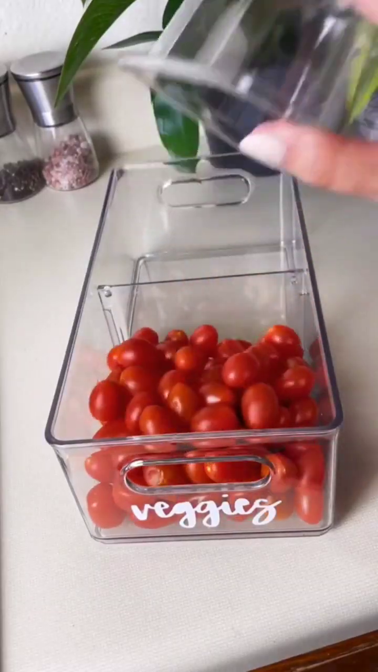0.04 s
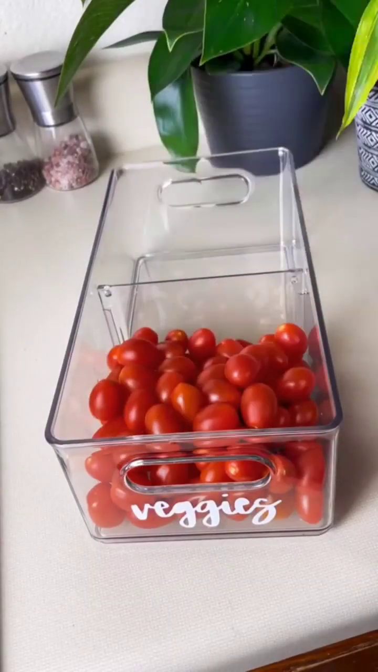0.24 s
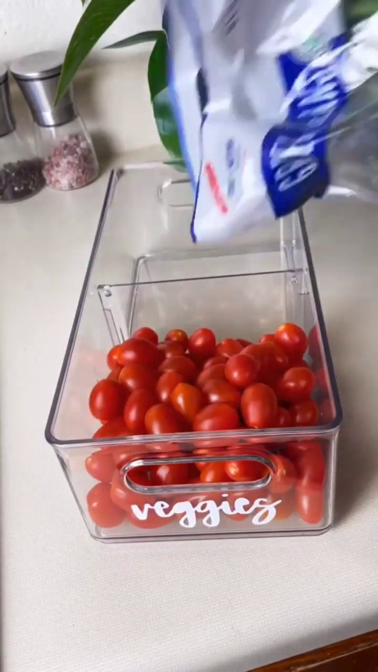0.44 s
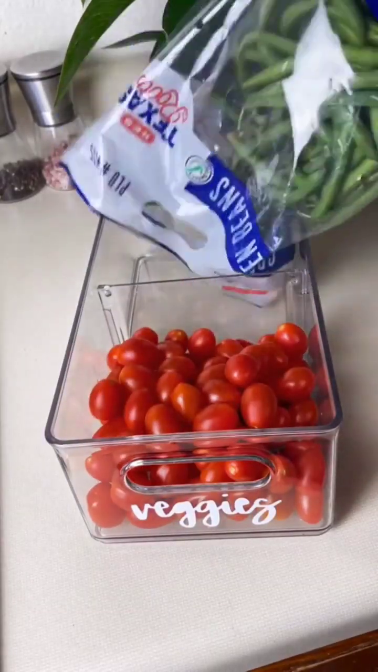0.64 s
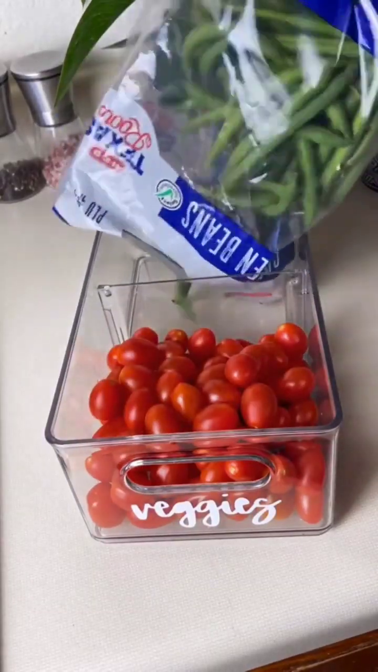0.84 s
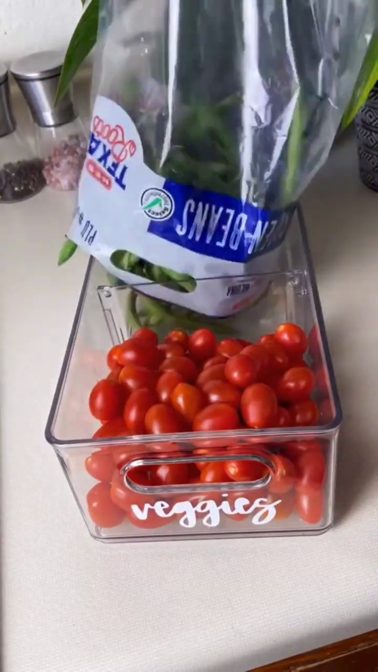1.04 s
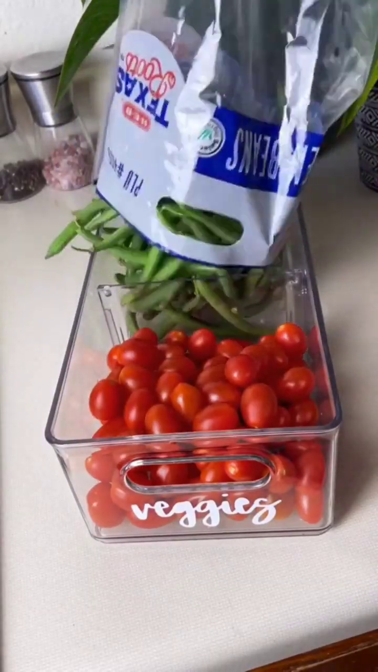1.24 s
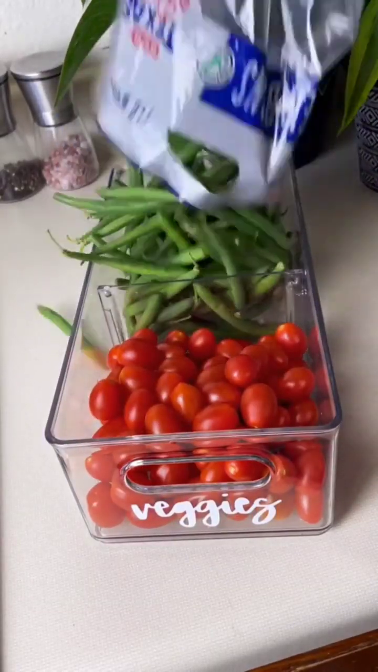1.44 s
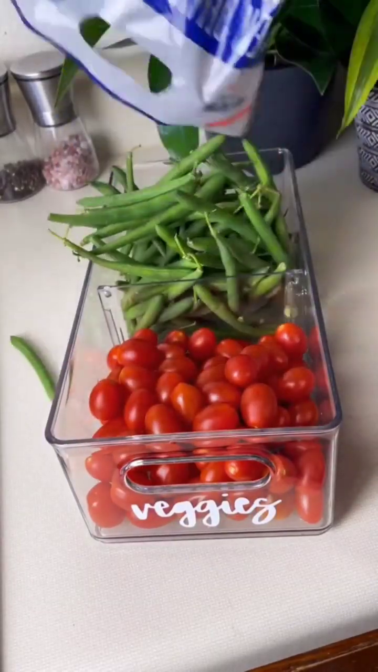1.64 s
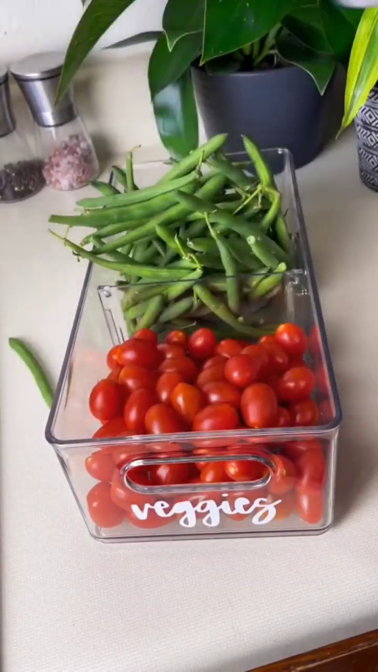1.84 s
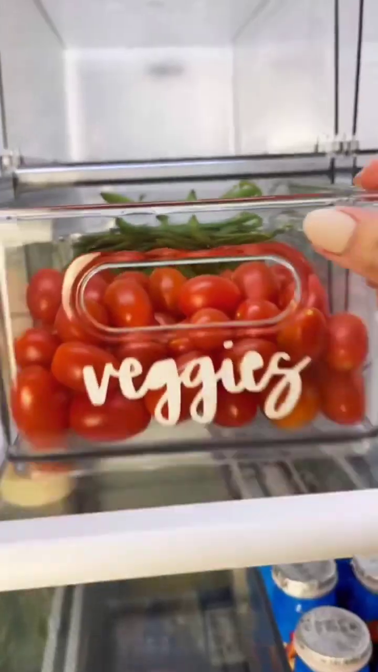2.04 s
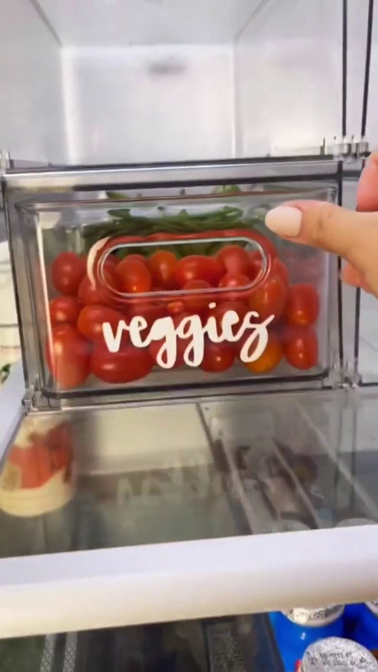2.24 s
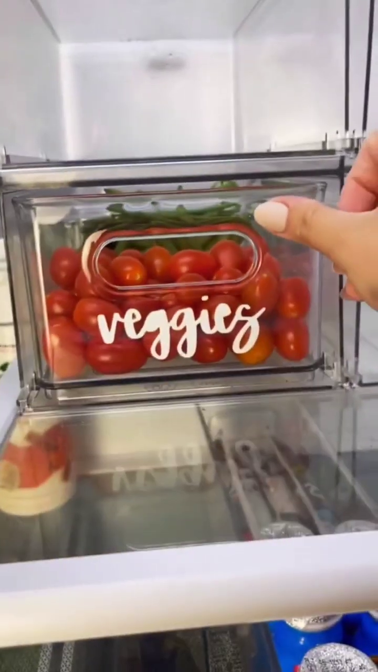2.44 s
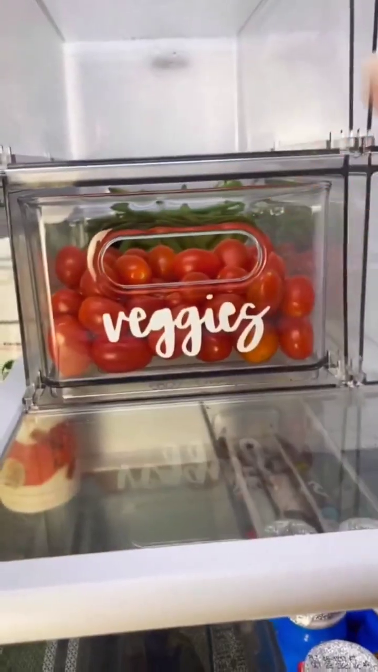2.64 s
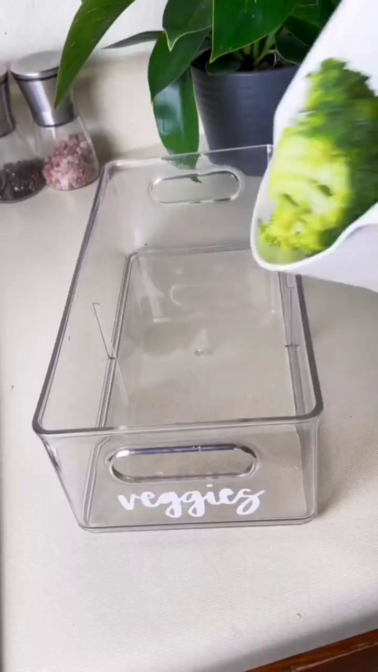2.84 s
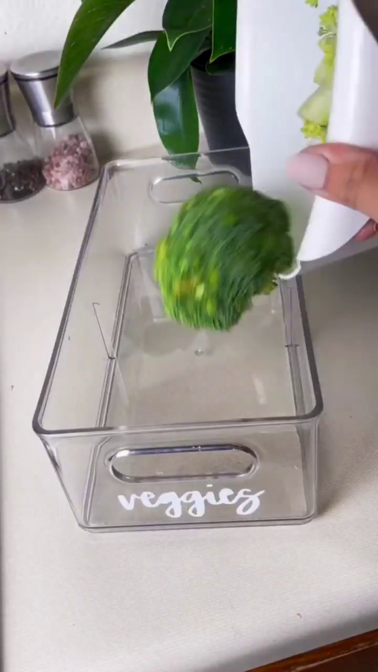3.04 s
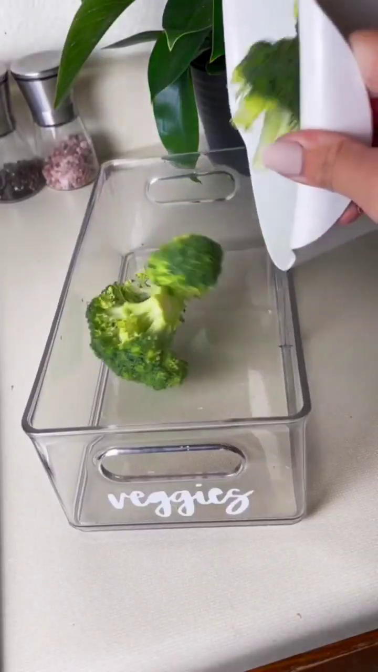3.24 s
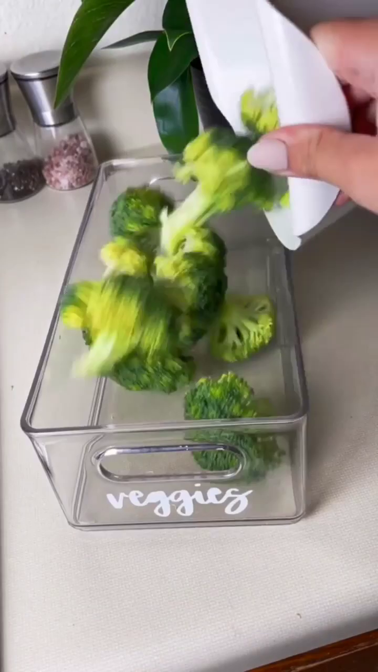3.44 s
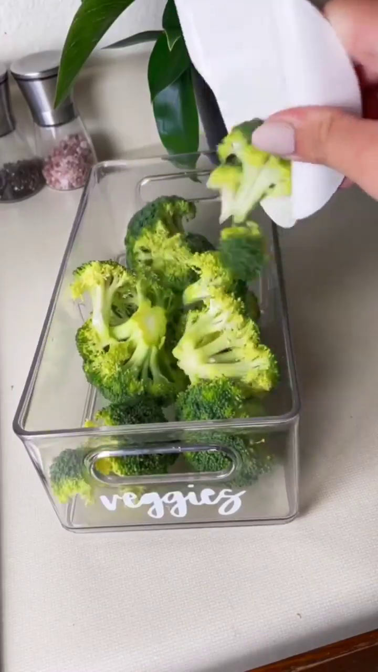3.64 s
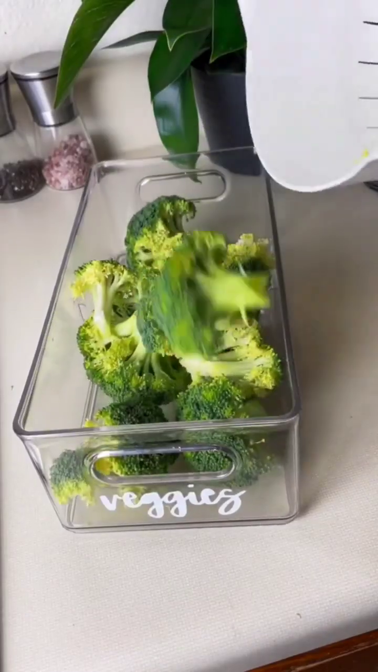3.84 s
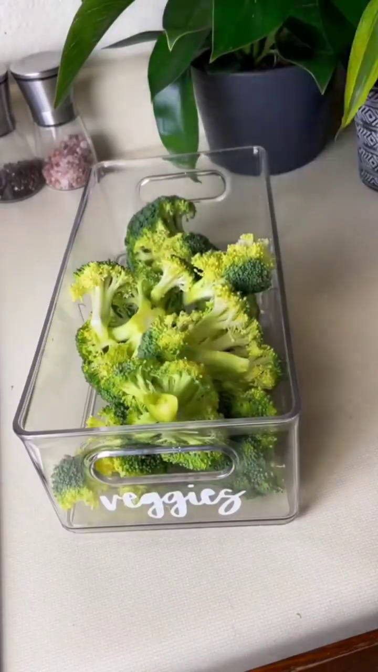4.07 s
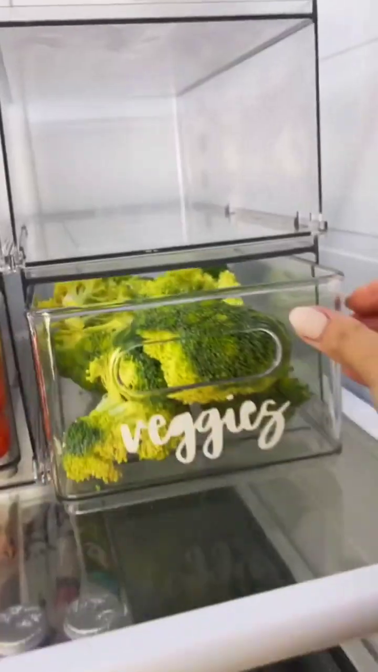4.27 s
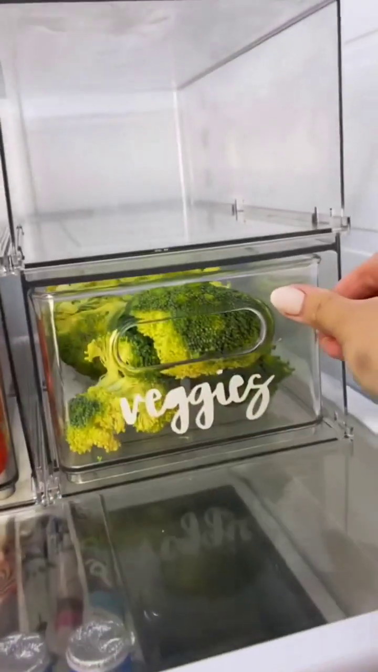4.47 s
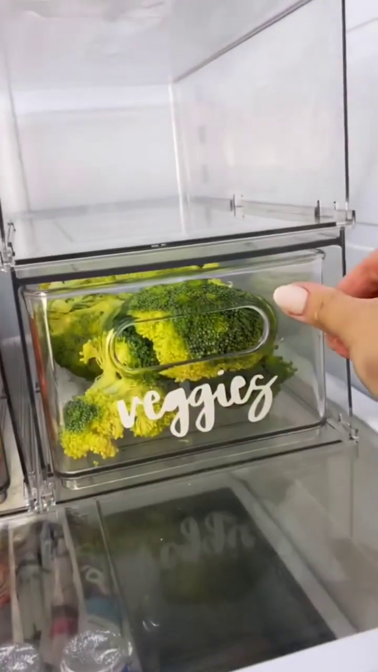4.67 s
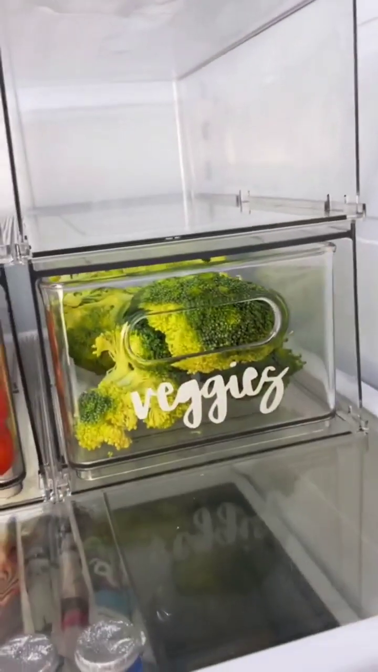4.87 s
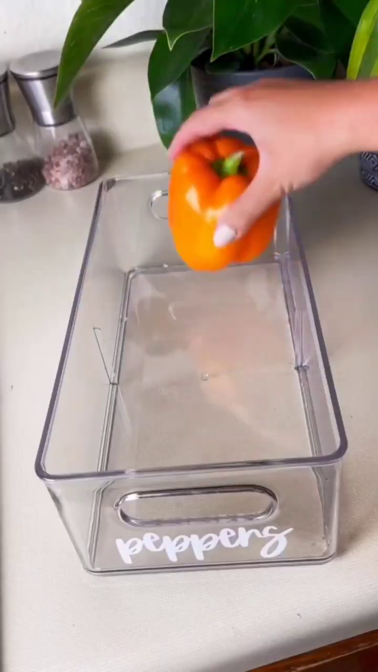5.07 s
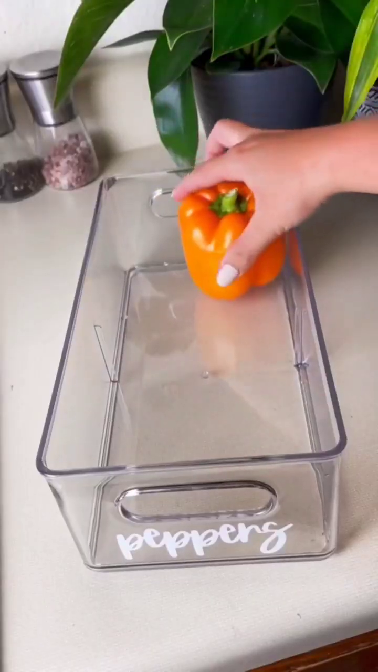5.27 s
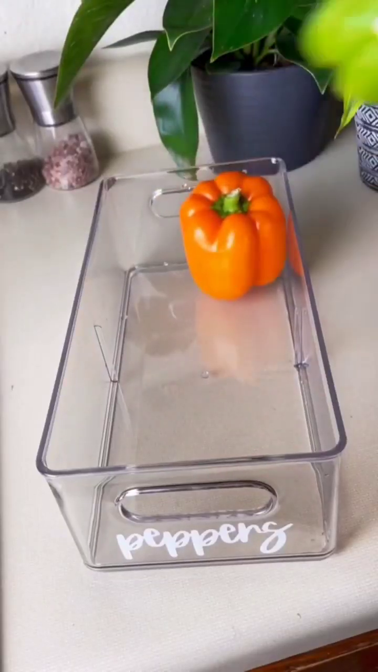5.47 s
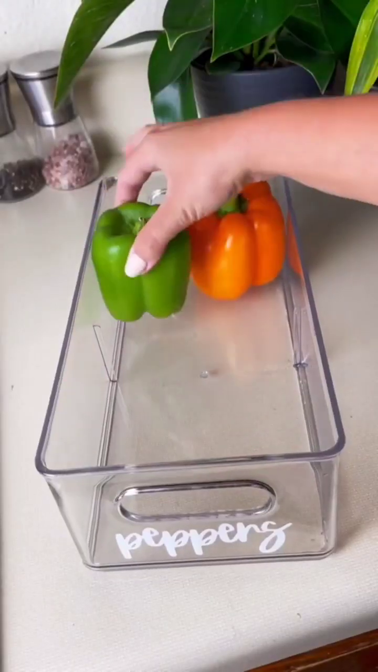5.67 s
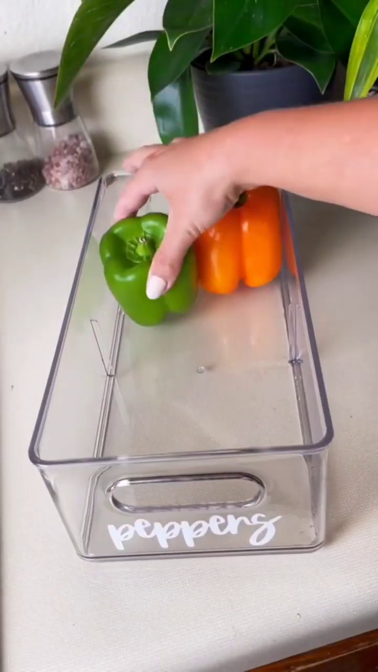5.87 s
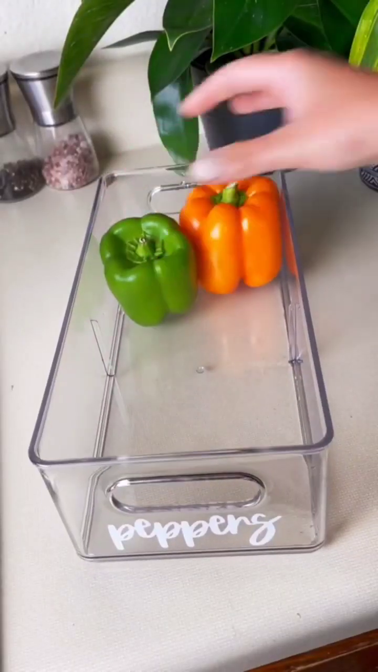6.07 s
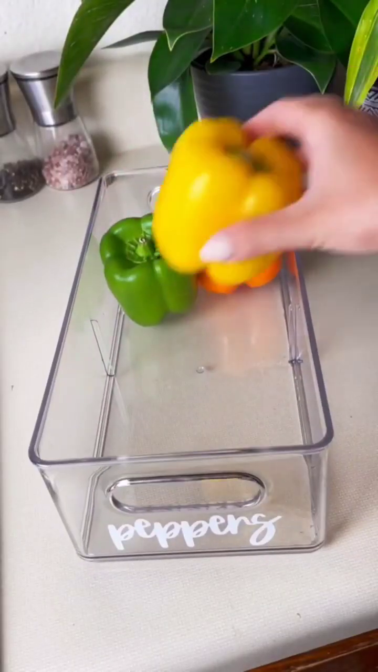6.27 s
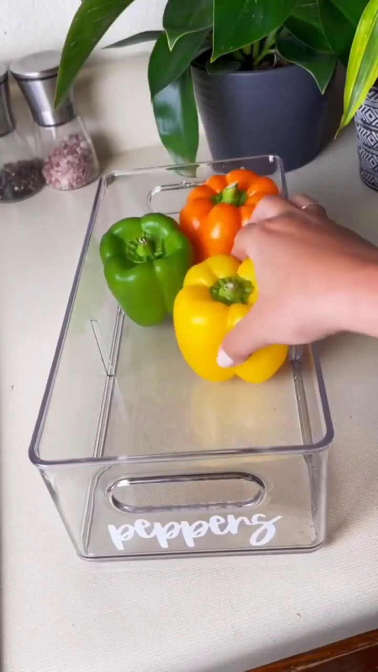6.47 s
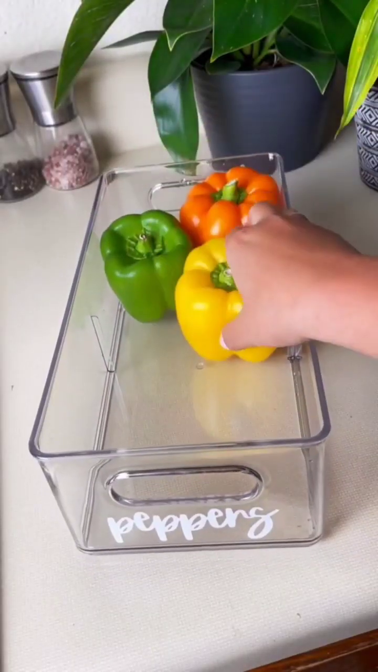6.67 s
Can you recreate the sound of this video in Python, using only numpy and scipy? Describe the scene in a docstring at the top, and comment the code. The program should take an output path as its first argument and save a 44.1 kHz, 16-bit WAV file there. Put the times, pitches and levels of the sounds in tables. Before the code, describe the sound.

A close stereo view of a small kitchen with short, dry echo. After a nearly quiet start, from 0.3 s thin plastic film crinkles and snaps brightly, strongest at 0.5 to 1.0 s, while green beans patter and click on a hard plastic bin; further folds and taps continue until about 1.65 s, with a faint last crinkle near 1.8 s. From 1.9 s a heavy bin scrapes along a refrigerator shelf, knocking lightly, and hits its stop with a deep thump at 2.3 s over low hum. Broccoli brushes out of a bowl and tumbles with hollow, soft-edged knocks from 3.0 to 3.55 s, then a few faint drops until 4.0 s. A second bin slides in at 4.1 s and bumps firmly at 4.45 s. From 5.1 to 6.6 s peppers land gently with quiet, dull thuds, small rubs and finger slides over low room rumble.

```python
"""Crinkling film and pattering beans come first, close to the microphone, from a kitchen counter.
Green beans pour from a bag into a clear plastic bin, broccoli tumbles from a bowl, peppers are set down.
Twice a full bin slides along a refrigerator shelf and bumps against its stop, over the cabinet's hum.
Film, patter and rubbing are random grains or scratches under swelling gains; blows are noise bursts
and damped sines of the plastic. Rumble, air, hum and hiss lie behind, and the kitchen answers with echo."""
import sys
import numpy as np
from scipy import signal
from scipy.fft import rfft, irfft, next_fast_len
from scipy.io import wavfile
from scipy.ndimage import uniform_filter1d, map_coordinates

SR = 44100
rng = np.random.default_rng(int(sys.argv[2]) if len(sys.argv) > 2 else 0)


def persist_wave(psi):
    """Save psi, clipped to +-1, as 16-bit WAV."""
    counts = np.round(np.clip(psi, -1, 1) * 32767).astype(np.int16)
    wavfile.write(sys.argv[1], SR, np.atleast_2d(counts).T)


N = 295911

# Contact levels are before the trims of each source; spectra are relative colours.
# Movements of the bag: (t/s, swell/s, length/s, crinkle level/dB, patter level/dB)
BAG_MOVES = [(0.268, .015, 0.48, -57, -59), (0.48, 0.074, 0.18, -41.5, -43),
             (0.547, 0.12, 0.92, -43.5, -45), (0.816, .01, 0.11, -40.5, -43.5),
             (0.912, 0.066, 0.099, -29.5, -31.5), (1.219, .01, 0.26, -50, -51),
             (1.552, 0.014, 0.067, -47, -49), (1.642, .01, 0.054, -56, -68)]
# Sharp folds of the film: (t/s, level before trim/dB)
FOLDS = [(0.292, -30.5), (0.3262, -30.5), (0.3612, -28), (0.4545, -32.5), (0.5166, -16.5), (0.5272, -22.5),
         (0.56, -20), (0.618, -17.5), (0.7, -20.5), (0.747, -16), (0.834, -23), (0.873, -23.5),
         (0.9446, -14.5), (0.985, -16), (1.246, -26), (1.2695, -18.5), (1.383, -25.5), (1.4319, -16),
         (1.5888, -24.5), (1.785, -40.5)]
# Colour of the film: (f/Hz, level/dB)
FILM_TONE = [(880, -36.5), (1500, -0.5), (2220, -5), (2580, -1.5), (2790, -2), (4990, -3.5), (5560, -4),
             (7470, -5), (8170, -9), (13500, -10.5), (15800, -13.5)]
# Beans that strike the bin: (t/s, wall knock level/dB, knock f/Hz, floor thud level/dB, click level/dB)
BEAN_HITS = [(0.294, -33.5, 820, -58, -50.5), (0.559, -30, 2600, -49, -29), (0.571, -22.5, 1130, -36, -41),
             (0.590, -26.5, 1440, -47.5, -39.5), (0.626, -12, 830, -40.5, -28),
             (0.6608, -16, 760, -32, -9.5), (0.714, -39, 516, -42.5, -33.5), (0.8195, -18, 3220, -28, -15),
             (0.8345, -23, 1450, -43.5, -30), (0.9865, -22, 2610, -26, -25.5),
             (1.009, -19.5, 1430, -37, -25.5), (1.024, -15.5, 1290, -29, -30.5),
             (1.049, -24, 2500, -33, -27.5), (1.144, -26, 730, -27, -34.5), (1.2462, -31, 1100, -45, -31),
             (1.344, -44, 1840, -50, -33.5), (1.365, -24, 2660, -24, -27), (1.385, -21.5, 2500, -47, -27),
             (1.413, -29, 2620, -35, -31), (1.437, -19.5, 1520, -34.5, -26),
             (1.451, -29.5, 1450, -32.5, -35.5), (1.488, -33, 2800, -37.5, -28),
             (1.5745, -20, 990, -37, -23), (1.5988, -26, 1490, -49, -35), (1.614, -30, 1500, -38.5, -38)]
# Colour of bean contacts: (f/Hz, level/dB)
BEAN_TONE = [(120, -27), (200, 3), (596, -4), (755, -3.5), (874, -4.5), (1910, -8), (2600, -1.5),
             (4030, -8.5), (4920, -9.5), (5910, -26.5), (15500, -23)]
# Colour of the small falling beans: (f/Hz, level/dB)
PATTER_TONE = [(82, -54.5), (140, -8), (183, 1.5), (235, -3), (442, 6), (488, -3), (1100, -5.5), (1360, -4),
               (1850, -14.5), (2550, -7.5), (4000, -18), (5200, -39.5), (8800, -120)]
# Nominal modes of the bin's floor under beans: (f/Hz, level/dB, t60/s)
BEAN_FLOOR = [(196, 1, .055), (330, -8, .035), (425, -5, .03)]
# Florets that land: (t/s, wall knock level/dB, knock f/Hz, floor thud level/dB, click level/dB)
FLORET_HITS = [(2.984, -32.5, 1493, -41.5, -49), (3.032, -36.5, 1232, -46.5, -58),
               (3.098, -32.5, 1260, -25, -32.5), (3.111, -24.5, 1627, -42.5, -41.5),
               (3.14, -11.5, 2200, -26.5, -24), (3.205, -31, 1193, -39, -33.5),
               (3.246, -34, 1135, -34.5, -39.5), (3.293, -29, 1193, -28, -45),
               (3.341, -36, 1367, -24.5, -41), (3.366, -14, 1184, -26, -29), (3.38, -27, 1303, -27, -30.5),
               (3.425, -34, 1320, -28, -38), (3.46, -28, 1170, -25.5, -33), (3.471, -20.5, 800, -24.5, -33),
               (3.487, -14, 1800, -19.5, -27.5), (3.517, -21, 1320, -27, -34),
               (3.529, -18, 850, -21, -38.5), (3.539, -24.5, 1263, -28, -34.5),
               (3.644, -41, 1180, -32, -56.5), (3.766, -56, 2470, -42, -52), (3.825, -47, 1390, -36, -50.5),
               (3.886, -40.5, 1800, -36, -50.5), (3.973, -31.5, 804, -32.5, -39)]
# Colour of floret contacts: (f/Hz, level/dB)
FLORET_TONE = [(190, -35), (320, 1.5), (430, -1), (560, -10), (760, 1), (1040, -7.5), (1600, -8.5),
               (2300, -14.5), (2510, -9), (2800, -9), (3820, -15.5), (4480, -18), (5020, -17.5),
               (15500, -41)]
# Colour of florets rolling on: (f/Hz, level/dB)
ROLLING_TONE = [(110, -35), (194, -5.5), (488, -4.5), (552, -10.5), (730, -13.5), (985, -17), (1150, -22),
                (1400, -22), (3500, -29.5), (4550, -48.5), (7700, -120)]
# Colour of florets rustling: (f/Hz, level/dB)
RUSTLE_TONE = [(1180, -20), (2000, -8.5), (3600, -8), (4320, -2), (4550, -7.5), (4960, -5), (15000, -24),
               (15800, -18)]
# Florets brush along the bowl: (t/s, length/s, level/dB)
BRUSHES = [(2.71, 0.0547, -59.5), (2.949, 0.069, -63), (3.092, 0.49, -58), (3.604, 0.22, -67.5)]
# Nominal modes of the bin's floor under broccoli: (f/Hz, level/dB, t60/s)
FLORET_FLOOR = [(194, 0, .07), (310, -14, .05), (370, -14, .06), (425, -13, .05)]
# A pepper touches the bin: (t/s, wall knock level/dB, knock f/Hz, floor thud level/dB, click level/dB)
PEPPER_HITS = [(5.126, -42, 487, -45, -72), (5.160, -43, 440, -41, -78), (5.186, -42.5, 1290, -57, -68),
               (5.252, -55, 1290, -49.5, -72), (5.312, -49.5, 613, -42, -89), (5.658, -47.5, 567, -42, -66),
               (5.682, -39.5, 425, -61, -63.5), (5.699, -35.5, 412, -42, -55), (5.726, -48, 1100, -58, -58),
               (5.806, -46, 544, -44, -76.5), (6.007, -43, 1480, -53, -53), (6.485, -34, 566, -38, -50),
               (6.538, -41, 1310, -33.5, -71), (6.582, -40.5, 1330, -45, -51)]
# Colour of pepper contacts and rubs: (f/Hz, level/dB)
PEPPER_TONE = [(150, 2.5), (250, 3.5), (573, -5), (1140, -15.5), (1310, -15), (1820, -21.5), (2530, -25.5),
               (3110, -31), (8620, -50), (12600, -45), (15500, -41.5)]
# A pepper is eased into place: (t/s, swell/s, length/s, level/dB)
RUBS = [(5.094, 0.02, 0.095, -50.5), (5.226, 0.012, 0.11, -62.5), (5.66, 0.037, 0.0512, -49),
        (5.739, 0.0098, 0.104, -57), (5.973, 0.027, 0.016, -54), (6.443, 0.037, 0.19, -51.5)]
# Fingers slide over a pepper's skin: (t/s, swell/s, length/s, level/dB)
TOUCHES = [(5.678, .02, .04, -68), (6.21, 0.017, .035, -74), (6.433, 0.055, .055, -63.5),
           (6.529, 0.048, .12, -72)]
# Colour of fingers on skin: (f/Hz, level/dB)
SKIN_TONE = [(1000, -23.5), (4000, 1), (9000, -9), (12500, 2.5), (15500, -5)]
# Nominal modes of the bin's floor under a heavy pepper: (f/Hz, level/dB, t60/s)
PEPPER_FLOOR = [(89.6, 5.5, 0.097), (231, -18, 0.24), (386.6, -16, 0.12)]
# A bin goes into the refrigerator:
# (t/s, slide length/s, stay length/s, scrape level/dB, hum level/dB, pitch ratio of the loaded bin)
VISITS = [(1.89, .46, 0.8, -49.5, -46, .62), (4.12, 0.37, 0.7, -50.5, -44, 0.96)]
# A full bin knocks on the shelf: (t/s, wall knock level/dB, knock f/Hz, floor thud level/dB, click level/dB)
SHELF_HITS = [(1.88, -40.5, 2650, -62, -33), (1.925, -39.5, 824, -38.5, -53),
              (1.997, -30.5, 606, -40.5, -59), (2.138, -33, 1260, -54, -58.5), (2.219, -31, 612, -41, -40),
              (2.254, -28, 2110, -49, -36.5), (2.276, -38, 2200, -29, -43.5), (2.289, -30, 543, -38, -52.5),
              (2.304, -21, 926, -44, -19), (2.316, -12, 1080, -14.5, -26), (2.471, -53, 1907, -46.5, -67.5),
              (2.576, -59.5, 1800, -52, -69), (4.144, -44.5, 1010, -27.5, -64),
              (4.166, -34.5, 1900, -35, -40), (4.205, -27.5, 530, -29.5, -40.5),
              (4.228, -33, 493, -38, -49), (4.418, -24, 756, -35, -42), (4.449, -15, 1218, -29, -24),
              (4.452, -15.5, 327, -10.5, -31.5), (4.471, -25, 1700, -26, -36.5),
              (4.500, -48, 2570, -57, -36.5), (4.536, -42, 1090, -48, -53), (4.663, -42.5, 950, -33, -77)]
# Colour of shelf contacts: (f/Hz, level/dB)
SHELF_TONE = [(130, -28), (210, 0), (300, 4.5), (540, -1), (663, -8.5), (1050, -11), (1280, -12.5),
              (1420, -15), (2210, -12.5), (3510, -20.5), (5570, -22), (11500, -31.5), (13100, -37),
              (15500, -33)]
# Colour of the sliding bin: (f/Hz, level/dB)
SCRAPE_TONE = [(76, -33), (130, 6), (247, -0.5), (346, -6), (440, 0), (644, -10), (819, -10), (1300, -13.5),
               (2560, -17), (6180, -23.5), (10600, -34), (12700, -41), (15500, -52.5)]
# The sliding bin catches and rubs: (t/s, length/s, level/dB)
DRAGS = [(1.946, 0.016, -62), (2.272, 0.028, -49), (4.175, 0.037, -49.5), (4.423, 0.014, -41.5)]
# Colour of those rubs: (f/Hz, level/dB)
DRAG_TONE = [(150, -34), (330, 5), (550, 5), (800, -5), (1250, 2), (2000, -6), (3500, -20), (12000, -36.5)]
# A loaded bin jolts the shelf: (t/s, sag level/dB, f/Hz)
JOLTS = [(1.925, -22, 104.8), (2.3176, -7, 108.3), (4.226, -25.5, 102.4), (4.456, -15, 108.5)]
# Modes of the sagging shelf: (multiple of its pitch, level/dB, t60/s)
SAG_MODES = [(1, 0, .175), (1.7, -13, .09), (2.25, -15, .07)]
# Modes of the bin before its load lowers them: (f/Hz, level/dB, t60/s)
BOOM_MODES = [(180, -4, .08), (250, -3, .06), (322, -3, .045), (382, -2.5, .05), (535, -17, .05)]
# Nominal resonances of the bin's plastic walls: (f/Hz, level/dB, t60/s)
WALL_MODES = [(693, -18.5, 0.065), (795, -9.5, 0.038), (1126, -20, .035), (1275, -24, .06),
              (1491, -17.5, 0.052), (1845, -14.5, 0.05), (2120, -21.5, 0.055), (2513, -16, 0.053),
              (3324, -24, 0.042), (3855, -20.5, 0.048), (4900, -32, .06)]
# How fast the kitchen's answer dies: (f/Hz, t60/s)
KITCHEN_DECAY = [(150, 0.25), (1000, 0.15), (5000, 0.12), (14000, 0.097)]
# Background at the microphone, step by step: (from t/s, deep rumble level/dB, room air level/dB, hum level/dB)
ROOM_STEPS = [(0, -61.5, -50, -63), (0.2, -63, -57, -89), (1.873, -54.5, -55, -72),
              (2.699, -68, -53.5, -78), (4.12, -53, -52.5, -64), (4.92, -51, -59.5, -61),
              (5.475, -49.5, -58, -61), (6.176, -51, -60.5, -59)]
# Colour of the deep rumble: (f/Hz, level/dB)
RUMBLE_TONE = [(20, -1), (45, -2), (80, 5.5), (110, -0.5), (160, -22), (400, -71)]
# Colour of the room air: (f/Hz, level/dB)
AIR_TONE = [(25, -34.5), (50, -20.5), (110, 6), (200, -0.5), (290, -8.5), (450, -11.5), (750, -21.5),
            (1100, -27), (2500, -40), (8000, -71)]
# Colour of the faint hiss: (f/Hz, level/dB)
HISS_TONE = [(500, -3), (5000, 1), (15000, -9)]
# Hum of appliances, mean level of each line: (f/Hz, level/dB)
HUM_LINES = [(120, 0.5), (232, 1.5), (387, -12.5), (725, -18.5)]
# Stereo width before each source's trim: (f/Hz, side over mid level/dB)
WIDTH = [(60, -13), (110, -23), (200, -16), (380, -16), (700, -12.5), (1290, -2), (2380, -5.5),
         (4400, -8.5), (8120, -9), (15000, -8.5)]
# Balance of the microphones: (f/Hz, left over right level/dB)
LEAN = [(60, 4.5), (110, 0.5), (200, 1), (380, 2), (700, 0.5), (1290, 3.5), (2380, 2.5), (4400, 1.5),
        (8120, 0.5), (15000, 0.5)]

FILM_STILLS_DB_PER_S, BEANS_SETTLE_DB_PER_S = 266.5, 127.5  # decay after each movement of the bag
FLUTTER_DB, FLUTTER_PER_S = 1.14, 70  # the film crumples in clumps: depth, rate
SNAP_RISE_S = .0012  # time constant of a fold turning over
ROLL_DB, SETTLE_DB_PER_S = -26, 114.5  # rolling after a landing: level against its table knock, decay
HUM_HZ, HUM_WIDTH_HZ = 105, 8  # the refrigerator's drone: centre, half width
BEAN_KNOCK_T60_S, BEAN_CLICK_T60_S, BEAN_LEAD_S = .06, .035, .0004  # firm pods tap short and abruptly
PEPPER_LEAD_S = .0014  # time constant of soft flesh bearing on the plastic
# How far the wall resonances stand out
BEAN_BODY_DB, FLORET_BODY_DB, SHELF_BODY_DB, PEPPER_BODY_DB = 3, 6, 4, 5
LOAD_SCATTER = .025  # standard deviation of the floor's pitch from blow to blow, as a share
WALL_ECHO_S, WALL_ECHO = .0012, 0.27  # a knock crosses the bin and returns: mean delay, strength
CRACK_T60_S = 0.011  # decay of an extra component at the start of a blow
WALL_WIDTH = .035  # half width of each wall resonance, as a share of its frequency
SPOT_WIDTH = .25  # half width of the struck spot's favour, as a share of the knock frequency
DIP_S = .012  # the background level dips briefly, from the third step on
LOW_CUT_HZ, TOP_HZ = 37, 15900  # deep bass is down 6 dB at the first; nothing from the second up


def bag():
    """The thin film crinkles whenever the bag moves, and now and then a fold snaps over."""
    crinkle = grains(FILM_TONE, rate=3500, spread_db=3.5, cycles=2, smooth=.7)
    crinkle = crinkle * amp(FLUTTER_DB * wobble(FLUTTER_PER_S))
    out = crinkle * sum(stroke(s, length, db, swell, FILM_STILLS_DB_PER_S)
                        for s, swell, length, db, _ in BAG_MOVES)
    t = np.arange(SR // 10) / SR
    shape = amp(-60 * t / .06) + 1.2 * amp(-60 * t / .008)  # the film flutters on after a crack
    shape = shape * (1 - np.exp(-t / SNAP_RISE_S))

    def snap_tone(hz):
        return amp(along(FILM_TONE, hz)) * (hz / 5000) ** 0.16

    for s, db in FOLDS:
        snap = stereo(shape * rng.standard_normal((2, len(t))), snap_tone, side_db=0.0)
        add(out, s, amp(db - 25.5) * unit(snap))
    return out


def beans():
    """A stream of beans patters down; the heavier clumps knock on the bin."""
    flow = sum(stroke(s, length, db, swell, BEANS_SETTLE_DB_PER_S)
               for s, swell, length, _, db in BAG_MOVES)
    patter = flow * grains(PATTER_TONE, rate=700, spread_db=2, cycles=5, smooth=.4)
    knocks = contacts(
        BEAN_HITS, BEAN_TONE, BEAN_FLOOR,
        knock_db=-10.5, click_db=-14.0, thud_db=9.5, ring_db=-9.5, spot_db=2.0, body_db=BEAN_BODY_DB,
        knock_t60=BEAN_KNOCK_T60_S, click_t60=BEAN_CLICK_T60_S, thud_rise=0.0066,
        lead=BEAN_LEAD_S, thud_lag=0.0023, side_db=-10.5, crack_db=2.0)
    return patter + knocks


def broccoli():
    """Florets brush out of the bowl and land in the bin; the louder the knock, the louder they roll on."""
    roll_power = sum(stroke(s, 0, knock + ROLL_DB, 0.0077, SETTLE_DB_PER_S) ** 2
                     for s, knock, *_ in FLORET_HITS)
    brush = sum(stroke(*row, attack_s=0.015, release_db_per_s=148.0) for row in BRUSHES)
    rolling = np.sqrt(roll_power) * grains(ROLLING_TONE, rate=640, spread_db=5.0, cycles=4.2, smooth=0.62)
    rustle = brush * grains(RUSTLE_TONE, rate=1200, spread_db=1, cycles=3, smooth=1.5)
    landings = contacts(
        FLORET_HITS, FLORET_TONE, FLORET_FLOOR,
        knock_db=-6, click_db=-7, thud_db=9, ring_db=-4.5, spot_db=0, body_db=FLORET_BODY_DB,
        knock_t60=.045, click_t60=0.038, thud_rise=0.0056,
        lead=0.0013, thud_lag=0.0041, side_db=-10.0, crack_db=-13)
    return rolling + rustle + landings


def peppers():
    """Hollow peppers land softly, their skins judder on the plastic and fingers slide off them."""
    press = sum(stroke(s, length, db, swell, release_db_per_s=333) for s, swell, length, db in RUBS)
    rub = press * judder(PEPPER_TONE, rate=140, slip_t60=.05, spread_db=2, body_db=PEPPER_BODY_DB)
    touch = sum(stroke(s, length, db, swell, release_db_per_s=300.5) for s, swell, length, db in TOUCHES)
    fingers = touch * grains(SKIN_TONE, rate=1200, spread_db=-1.5, cycles=3, smooth=2)
    landings = contacts(
        PEPPER_HITS, PEPPER_TONE, PEPPER_FLOOR,
        knock_db=-4.0, click_db=-4.5, thud_db=9.5, ring_db=-19, spot_db=10, body_db=PEPPER_BODY_DB,
        knock_t60=.06, click_t60=0.07, thud_rise=0.0076,
        lead=PEPPER_LEAD_S, thud_lag=0.003, side_db=-9.0, crack_db=-2.5)
    return rub + fingers + landings


def refrigerator():
    """A bin scrapes along the shelf, catches now and then and jolts it at the stop; the cabinet hums."""
    scrape = grains(SCRAPE_TONE, rate=2300, spread_db=3, cycles=14.0, smooth=1.0)
    drone = unit(colour(rng.standard_normal(N), lambda hz: 1 / (1 + ((hz - HUM_HZ) / HUM_WIDTH_HZ) ** 2)))
    out = np.zeros((2, N))
    for start, slide, stay, scrape_db, hum_db, pitch in VISITS:
        out += scrape * stroke(start, slide, scrape_db, attack_s=0.046, release_db_per_s=279)
        out += drone * stroke(start, stay, hum_db, attack_s=0.44, release_db_per_s=418)
        hits = [row for row in SHELF_HITS if abs(row[0] - start) < 1]
        boom = [(hz * pitch, db, t60) for hz, db, t60 in BOOM_MODES]  # a heavy load lowers the modes
        out += contacts(
            hits, SHELF_TONE, boom,
            knock_db=-9.5, click_db=-9.0, thud_db=4.5, ring_db=-30.0, spot_db=8.0, body_db=SHELF_BODY_DB,
            knock_t60=.06, click_t60=0.08, thud_rise=0.005,
            lead=0.0022, thud_lag=0.0014, side_db=0.0, crack_db=-5.5)
    rub = judder(DRAG_TONE, rate=90, slip_t60=.025, spread_db=5, body_db=SHELF_BODY_DB)
    out += rub * sum(stroke(*row, attack_s=0.012, release_db_per_s=498.5) for row in DRAGS)
    for s, sag_db, sag_hz in JOLTS:
        sag = [(sag_hz * k, db, t60) for k, db, t60 in SAG_MODES]
        add(out, s, amp(sag_db) * ring(sag, rise=.008))
    return out


def contacts(table, tone, floor, knock_db, click_db, thud_db, ring_db, spot_db, body_db,
             knock_t60, click_t60, thud_rise, lead, thud_lag, side_db, crack_db):
    """Each contact builds up as the body presses on, clicks, rattles the walls and swings the floor."""
    out = np.zeros((2, N))
    early, head = .02, SR // 100  # bursts start 20 ms early; their energy is scaled over 10 ms
    t = np.arange(SR // 5) / SR - early

    def dull(hz):
        return 1 / np.sqrt(1 + (hz / 2400) ** 6)

    def bright(hz):
        return np.sqrt(1 - dull(hz) ** 2)

    def burst(share, t60):
        age = np.maximum(t, 0)
        decay = amp(-60 * age / t60) + amp(crack_db - 60 * age / CRACK_T60_S)
        shape = decay / (1 + np.exp(np.minimum(-t / lead, 50)))
        delay = WALL_ECHO_S * (.5 + rng.random())

        def gain(hz):
            echo = np.abs(1 + WALL_ECHO * np.exp(2j * np.pi * hz * delay))
            return amp(along(tone, hz)) * share(hz) * echo * resonant(hz, body_db)

        x = stereo(shape * rng.standard_normal((2, len(t))), gain, side_db)
        return x / np.sqrt(np.sum(x ** 2) / (2 * head))

    for s, knock, knock_hz, thud, click in table:
        def struck(hz):  # the spot that is struck favours one pitch
            return dull(hz) * (1 + amp(spot_db) / (1 + ((hz - knock_hz) / (.11 * knock_hz)) ** 2))

        load = 1 + LOAD_SCATTER * rng.standard_normal()
        loaded_floor = [(hz * load, db, t60) for hz, db, t60 in floor]
        add(out, s - early, amp(knock + knock_db) * burst(struck, knock_t60))
        add(out, s - early, amp(click + click_db) * burst(bright, click_t60))
        add(out, s, amp(knock + ring_db) * walls(knock_hz, spot_db))
        add(out, s + thud_lag, amp(thud + thud_db) * ring(loaded_floor, thud_rise))
    return out


def walls(knock_hz, spot_db):
    """Each contact rings the plastic walls at new strengths, favouring the modes near the struck pitch."""
    t = np.arange(SR // 5) / SR
    hz, db, t60 = np.transpose(WALL_MODES)[..., None]
    detune, vary, turn = rng.standard_normal((3, len(WALL_MODES), 1))
    favour = 1 + amp(spot_db) / (1 + ((hz / knock_hz - 1) / SPOT_WIDTH) ** 2)
    level = favour * amp(db + 2 * vary - 60 * t / t60)
    modes = level * np.exp(2j * np.pi * (hz * (1 + .018 * detune) * t + turn))
    mid = modes.real.sum(axis=0)
    side = (modes.imag * amp(along(WIDTH, hz))).sum(axis=0)
    return (1 - np.exp(-(t / 0.0026) ** 2)) * np.array([mid + side, mid - side])


def ring(modes, rise):
    """Damped sines that swell while a soft body presses on."""
    t = np.arange(SR // 2) / SR
    swing = sum(amp(db - 60 * t / t60) * np.sin(2 * np.pi * hz * t) for hz, db, t60 in modes)
    return (1 - np.exp(-(t / rise) ** 2)) * swing


def resonant(hz, body_db):
    """Gain of the bin's walls, which favour their own modes."""
    centres = np.transpose(WALL_MODES)[0][:, None]
    return amp(body_db * np.max(1 / (1 + ((hz / centres - 1) / WALL_WIDTH) ** 2), axis=0))


def judder(tone, rate, slip_t60, spread_db, body_db):
    """Stick and slip: short scratches at an uneven rate, coloured by the bin's walls; rms 1."""
    gap, size = rng.random((int(2 * rate * N / SR), 2)).T
    at = (np.cumsum(.3 + 1.4 * gap) * SR / rate).astype(int)
    slips = np.bincount(at, amp(spread_db * (2 * size - 1)), N)[:N]
    grip = signal.fftconvolve(slips, amp(-60 * np.arange(SR // 10) / SR / slip_t60))[:N]

    def gain(hz):
        return amp(along(tone, hz)) * resonant(hz, body_db)

    return unit(stereo(grip * rng.standard_normal((2, N)), gain, side_db=-5))


def grains(spectrum, rate, spread_db, cycles, smooth):
    """Tiny random impacts, each with its own size, pitch and side, over a smooth rush; rms 1."""
    count, t = int(rate * N / SR), np.arange(256) / SR
    when, pitch, size, pan, phase = rng.random((5, count, 1))
    hz = 500 * 30 ** pitch
    life = np.clip(cycles / hz, 1e-4, .002)
    level = amp(spread_db * np.minimum(-np.log(1 - size), 3.5)) * np.sqrt(hz / life)
    pings = level * np.exp(-t / life) * np.sin(2 * np.pi * (hz * t + phase))
    at = ((when * N).astype(int) + np.arange(len(t))).ravel()
    pair = np.array([unit(np.bincount(at, (pings * weight).ravel(), N)[:N]) for weight in (1, pan - .5)])
    pair = pair + smooth * rng.standard_normal((2, N))
    return unit(stereo(pair, lambda hz: amp(along(spectrum, hz)), side_db=-1.0))


def kitchen(x):
    """The room's answer: each frequency dies at its own speed, and the bass is nearly alike on both sides."""
    hz, t, z = signal.stft(rng.standard_normal((2, SR // 2)), SR, nperseg=256)
    fade = amp(-60 * t / along(KITCHEN_DECAY, hz)[:, None])
    mid, side = signal.istft(z * fade, SR, nperseg=256)[1]
    side = colour(side, lambda hz: hz / (hz + 900))
    tail = np.array([mid + side, mid - side])
    # the answer starts 6 ms late
    tail = np.pad(tail / np.linalg.norm(tail[0]), ((0, 0), (round(.006 * SR), 0)))
    return signal.fftconvolve(x.mean(axis=0)[None], tail, axes=1)[:, :N]


def room_tone():
    """Deep rumble, dull air and appliance hum at stepped levels, with brief dips, over a faint hiss."""
    def noise(spectrum):
        return unit(stereo(rng.standard_normal((2, N)), lambda hz: amp(along(spectrum, hz)), side_db=3.0))

    t = np.arange(N) / SR
    drone = unit(sum(amp(db + 1.4 * wobble(2.3)) * np.sin(2 * np.pi * hz * t + 0.76 * wobble(7.8))
                     for hz, db in HUM_LINES))
    starts, *levels = np.transpose(ROOM_STEPS)
    step = np.searchsorted(starts[1:], t)
    deep, air, hum = uniform_filter1d(amp(levels)[:, step], size=1024)
    dipped = (step > 1) & (t - starts[step] < DIP_S)
    dips = uniform_filter1d(np.where(dipped, .2, 1), size=128)
    background = deep * noise(RUMBLE_TONE) + air * noise(AIR_TONE) + hum * drone
    return dips * (background + amp(-84) * noise(HISS_TONE))


def stroke(start, length, db, attack_s, release_db_per_s):
    """Gain of one movement: it swells, holds and dies away."""
    t = np.arange(N) / SR - start
    return np.clip(t / attack_s, 0, 1) * amp(db - release_db_per_s * np.maximum(t - length, 0))


def wobble(rate):
    """A smooth random curve, rate knots a second."""
    return map_coordinates(rng.standard_normal(int(N * rate / SR) + 4), [np.arange(N) * rate / SR])


def stereo(pair, gain, side_db):
    """Colour two signals and use them as mid and side."""
    mid = colour(pair[0], gain)
    side = colour(pair[1], lambda hz: gain(hz) * amp(along(WIDTH, hz) + side_db))
    return np.array([mid + side, mid - side])


def colour(x, gain):
    """Causal minimum-phase filter with the given gain of frequency, by way of the cepstrum."""
    n = x.shape[-1]
    m = 2 * next_fast_len(n // 2 + 4096)
    cepstrum = irfft(np.log(np.maximum(gain(np.fft.rfftfreq(m, 1 / SR)), 1e-6)))
    cepstrum[1:m // 2] *= 2
    cepstrum[m // 2 + 1:] = 0
    return irfft(rfft(x, m) * np.exp(rfft(cepstrum)), m)[..., :n]


def add(track, s, sound):
    """Mix a sound in at a time in seconds."""
    place = track[:, round(s * SR):][:, :sound.shape[-1]]
    place += sound[..., :place.shape[-1]]


def along(points, hz):
    """Read (f/Hz, value) points on a log frequency axis."""
    f, v = np.transpose(points)
    return np.interp(np.log(hz + 1), np.log(f + 1), v)


def unit(x):
    """Scale to rms 1."""
    return x / np.sqrt(np.mean(x ** 2) + 1e-20)


def amp(db):
    """Decibels to gain."""
    return 10 ** (np.asarray(db) / 20)


def scene():
    """Counter and refrigerator are heard directly and through the kitchen's answer, over the room tone."""
    counter = bag() + beans() + broccoli() + peppers()
    shelf = refrigerator()
    answer = kitchen(amp(-9.0) * counter + amp(-8.5) * shelf)
    return counter + shelf + answer + room_tone()


def record(dry):
    """The left microphone hears a little more; both lose the deepest bass and all above the band limit."""
    m = next_fast_len(N + SR // 2)
    hz = np.fft.rfftfreq(m, 1 / SR)
    lean = amp(np.outer([.5, -.5], along(LEAN, hz)))
    low_cut = hz ** 2 / (hz ** 2 + LOW_CUT_HZ ** 2)
    return irfft(rfft(dry, m) * lean * low_cut * (hz < TOP_HZ), m)[:, :N]


dry = scene()
out = record(dry)
persist_wave(out)
```